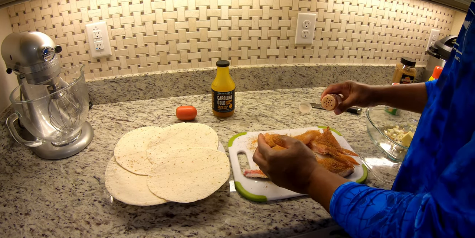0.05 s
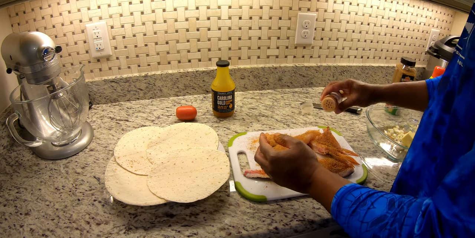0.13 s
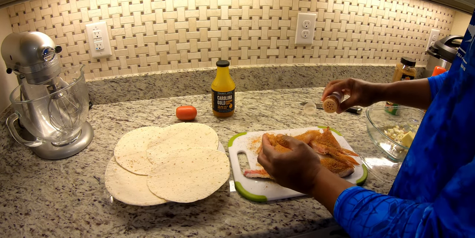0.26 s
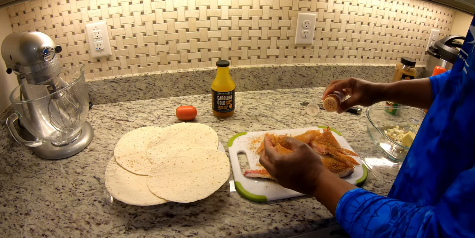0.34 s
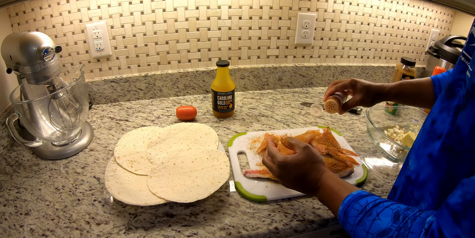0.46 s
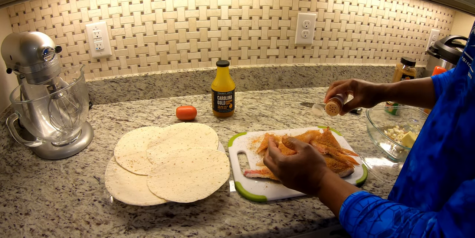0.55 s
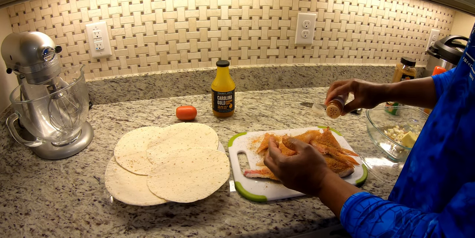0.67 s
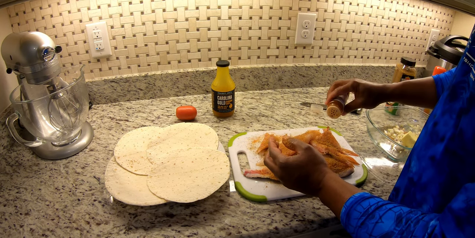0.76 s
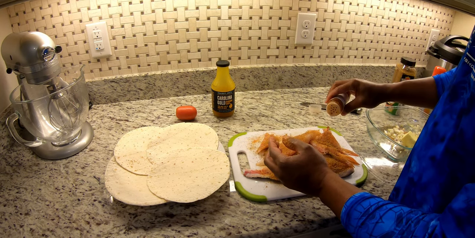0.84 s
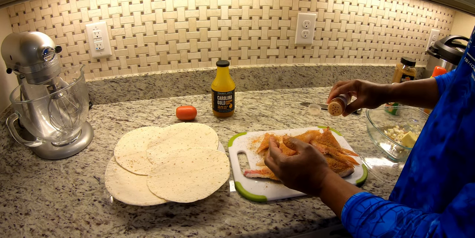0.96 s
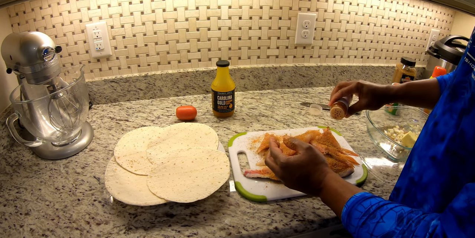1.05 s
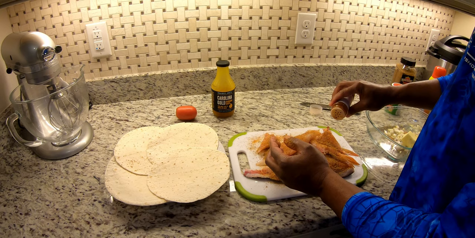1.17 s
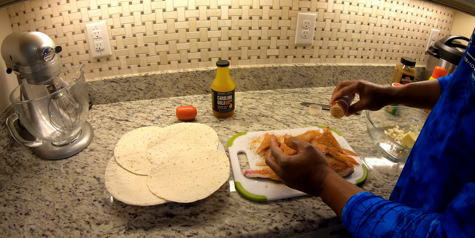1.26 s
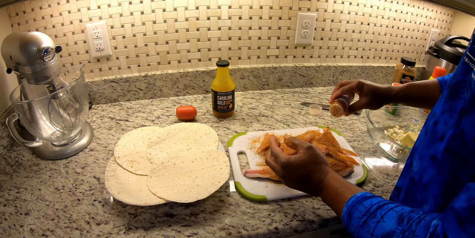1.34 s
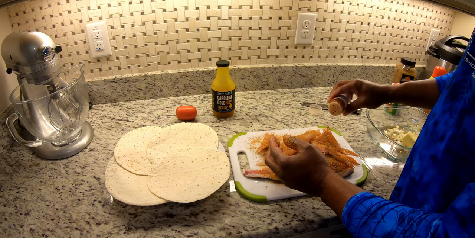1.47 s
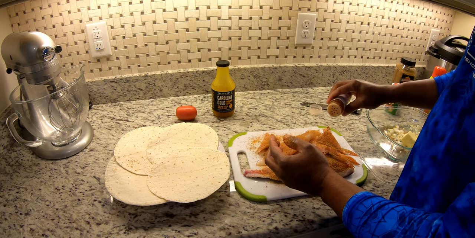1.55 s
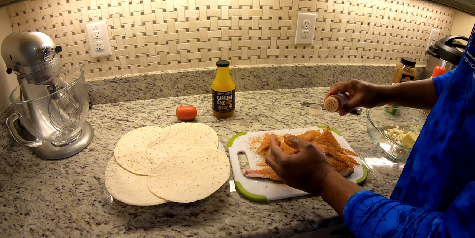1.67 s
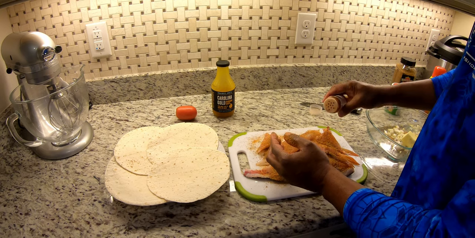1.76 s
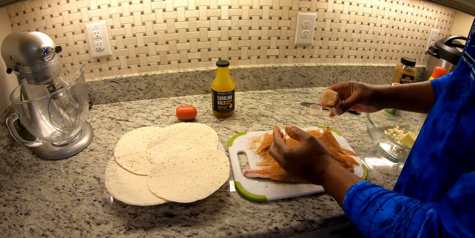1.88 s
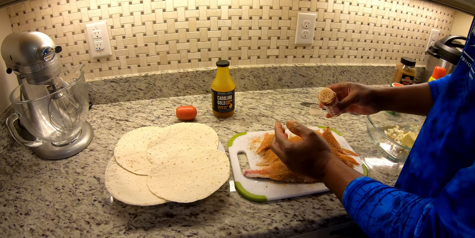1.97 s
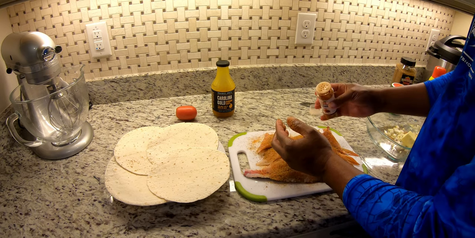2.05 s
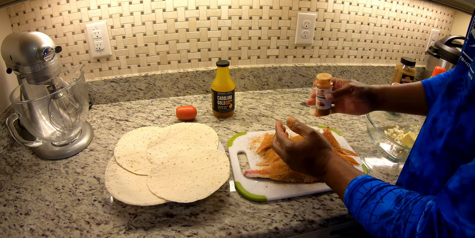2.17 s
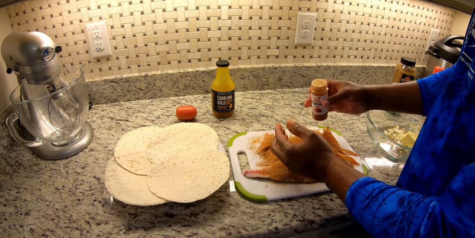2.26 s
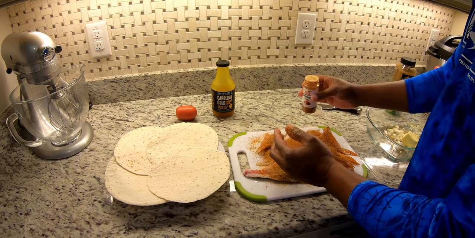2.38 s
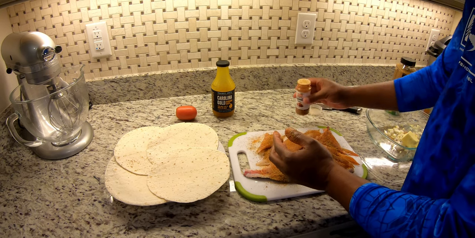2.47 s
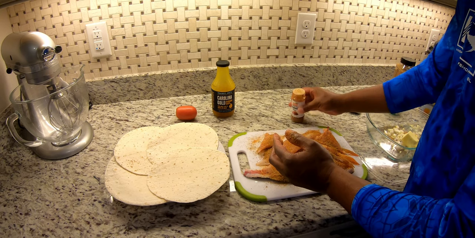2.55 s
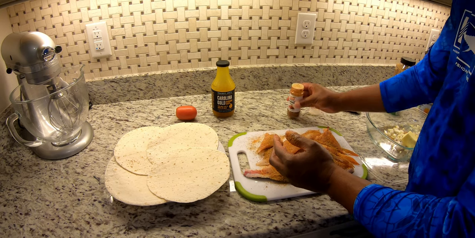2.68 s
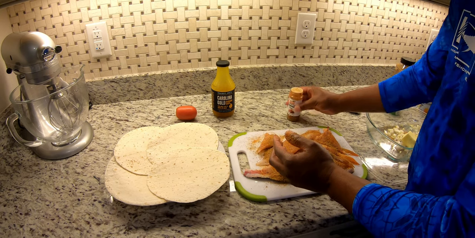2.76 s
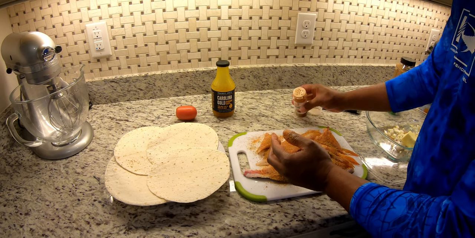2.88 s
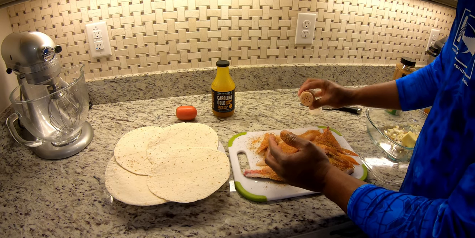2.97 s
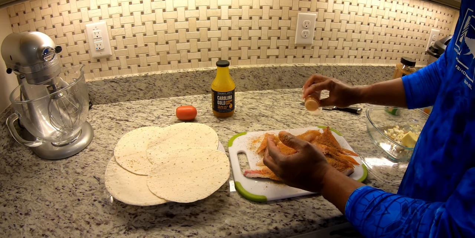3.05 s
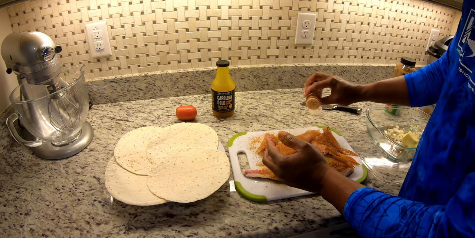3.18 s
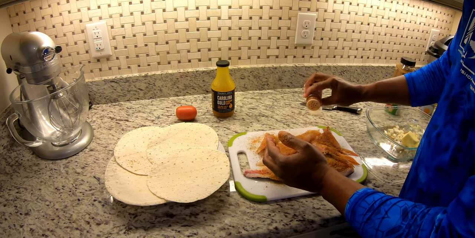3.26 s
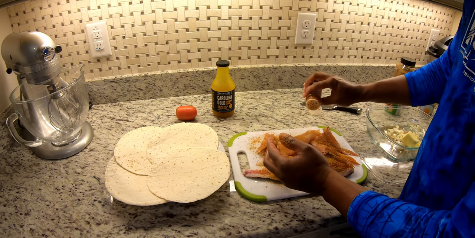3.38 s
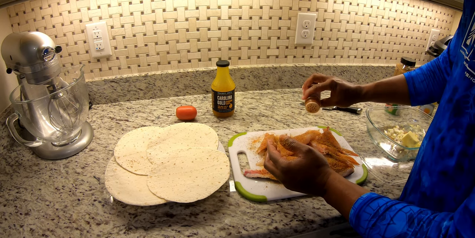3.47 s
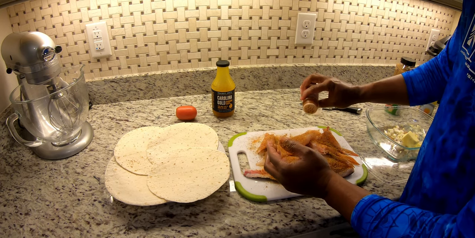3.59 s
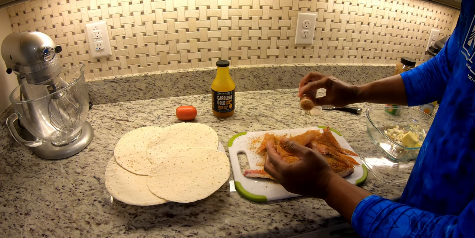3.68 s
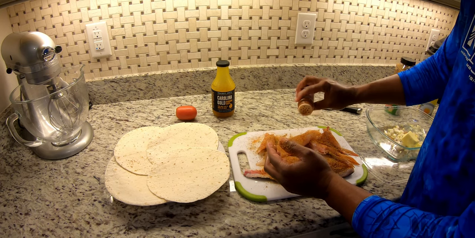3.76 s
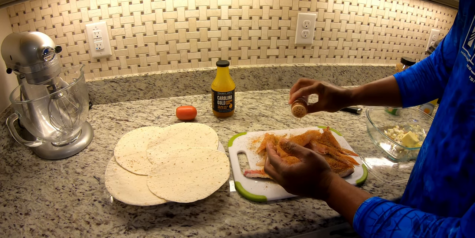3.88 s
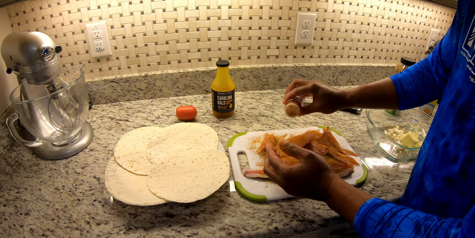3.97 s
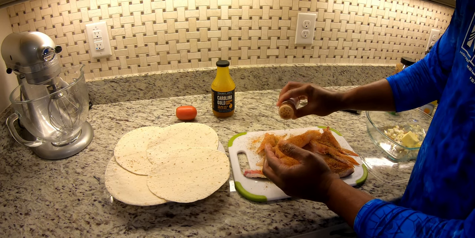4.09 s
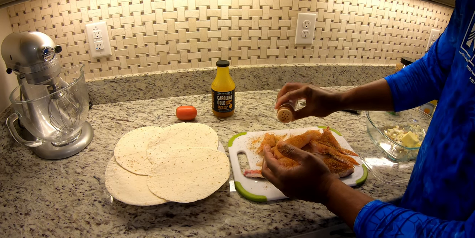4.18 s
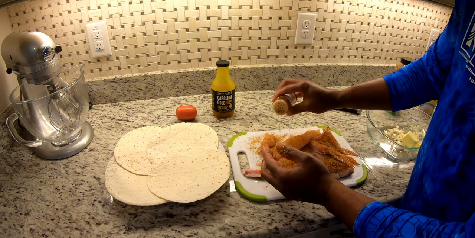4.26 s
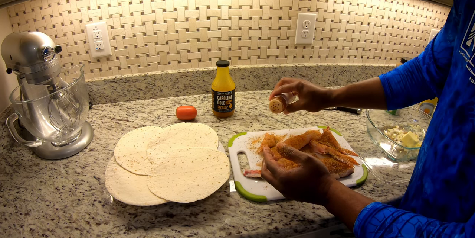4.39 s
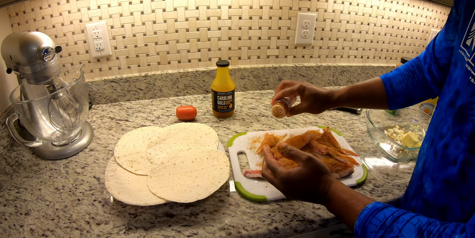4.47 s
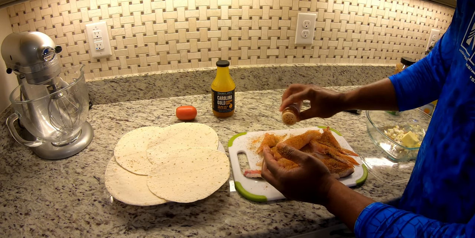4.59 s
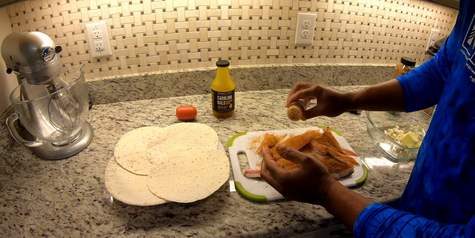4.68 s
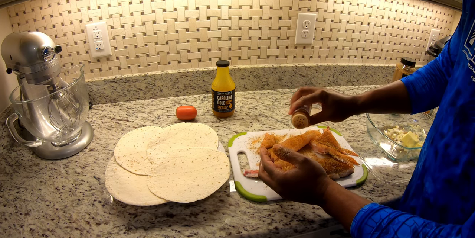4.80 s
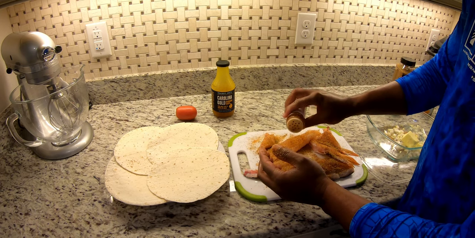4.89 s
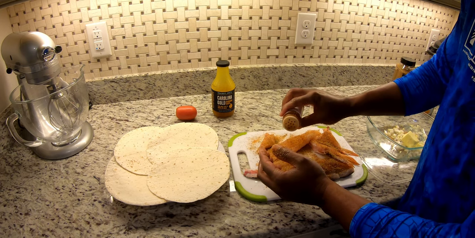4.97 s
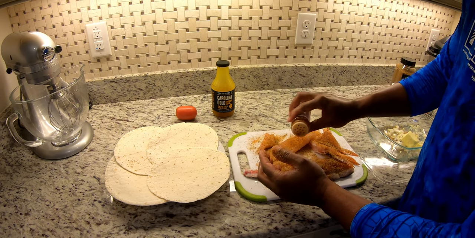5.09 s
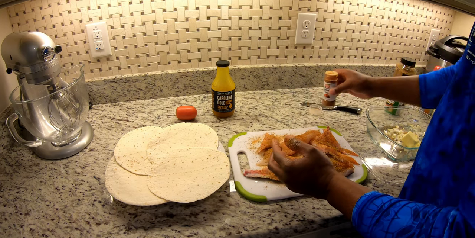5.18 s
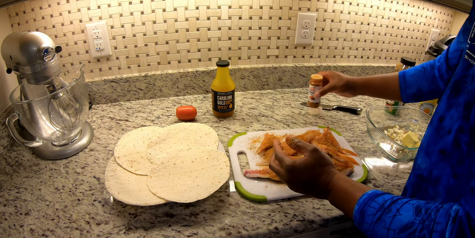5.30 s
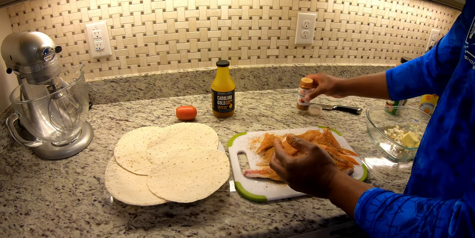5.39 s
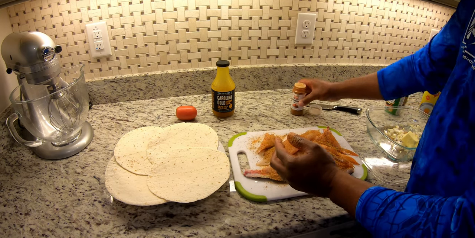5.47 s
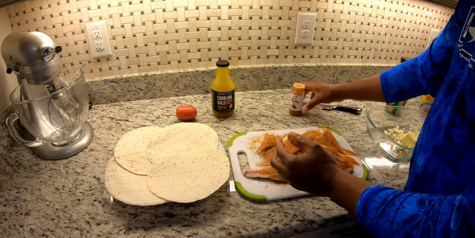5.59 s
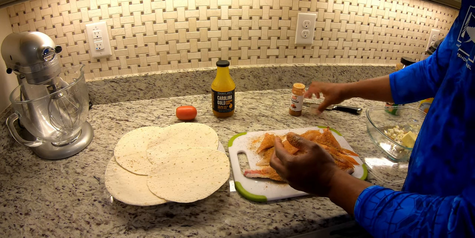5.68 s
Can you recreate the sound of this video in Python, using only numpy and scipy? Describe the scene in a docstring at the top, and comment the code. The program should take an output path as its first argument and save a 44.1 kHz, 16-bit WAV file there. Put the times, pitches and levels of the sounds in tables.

```python
"""A spice bottle is tipped and shaken in a hard-walled kitchen: the heap slides inside it, then grains
slap the plastic cap, faster and faster, and set the bottle's wall and air ringing. A few last grains drop.
The base knocks twice on the stone counter, each time a low thud and a crack; soft touches and faint rustles
are heard around this. A hollow metallic ring of fading partials starts abruptly, the room air and motor hum
come up with it, and the bottle is set down with a thud."""
import sys
import numpy as np
from scipy import signal
from scipy.fft import rfft, irfft
from scipy.io import wavfile

SR = 44100
rng = np.random.default_rng(int(sys.argv[2]) if len(sys.argv) > 2 else 0)


def transcribe(u):
    """Save the signal u as a 16-bit wav file named by the first command-line argument.

    u: samples, shape (n,) or (channels, n), limited to [-1, 1]; the rate is SR.
    q: integer samples, one column per channel.
    """
    v = np.clip(np.atleast_2d(u).T, -1, 1)
    q = np.round(v * 32767).astype(np.int16)
    wavfile.write(sys.argv[1], SR, q)


N = 253134
TIME = np.arange(N) / SR   # [s]
RING_S = 5.1745   # the metallic ring starts and the background comes up


def from_db(db):
    """Turn decibels into a gain."""
    return 10 ** (np.asarray(db) / 20)


def at_hz(points, hz, axis=1):
    """Read one column of a table at any frequency, on a log-frequency axis."""
    points = np.array(points)
    return np.interp(np.log(np.maximum(hz, 1)), np.log(points[:, 0]), points[:, axis])


def through(x, response):
    """Pass a sound through an impulse response."""
    return signal.fftconvolve(x, response)[:N]


def colour(x, spectrum, size=4096):
    """Give a sound the shape of a spectrum, with no sound ahead of time; white noise keeps its power."""
    log_gain = np.log(from_db(at_hz(spectrum, np.fft.rfftfreq(size, 1 / SR))))
    # folding the cepstrum forward makes the filter minimum-phase
    cepstrum = irfft(log_gain)
    cepstrum[1:size // 2] *= 2
    cepstrum[size // 2 + 1:] = 0
    response = irfft(np.exp(rfft(cepstrum)))
    return through(x, response / np.linalg.norm(response))


def struck(modes):
    """A struck object: a sum of sines that each fade by 60 dB in their t60, one second long."""
    t = TIME[:SR]
    return sum(from_db(db - 60 * t / t60) * np.sin(2 * np.pi * hz * t) for hz, db, t60 in modes)


def resonances(modes):
    """Impulse response of (Hz, width Hz, dB) resonances: wider ones die sooner; dB is the gain at the peak."""
    t = TIME[:SR // 20]
    response = 0
    for hz, width, db in modes:
        peak = from_db(db) * 2 * np.pi * width / SR
        response = response + peak * np.exp(-np.pi * width * t) * np.cos(2 * np.pi * hz * t)
    return response


def burst(start, length, rise, fall):
    """A loudness curve that rises, holds for a length and dies away (all in s)."""
    age = np.maximum(TIME - start, 0)
    time_falling = np.maximum(age - length, 0)
    return (1 - np.exp(-age / rise)) * np.exp(-np.minimum(time_falling / fall, 20))


def grains(per_s, spread_db):
    """Random tiny collisions of uneven size, scaled to an rms of 1."""
    sizes = from_db(spread_db * np.minimum(rng.exponential(1, N), 3)) * rng.choice([-1, 1], N)
    clicks = sizes * (rng.random(N) < per_s / SR)
    return clicks / np.std(clicks)


# colour of the quiet kitchen's air: (frequency [Hz], relative level [dB per Hz])
AIR_SPECTRUM = [(40, -5), (80, -4), (110, -1.5), (200, 0), (280, -1.5), (335, -8.5), (420, -2.5), (750, -7),
                (1000, -11.5), (1250, -15), (1450, -21), (2100, -19), (5000, -25.5), (10500, -27),
                (16000, -37)]
# appliance motor before the ring starts: (frequency [Hz], level [dB rms])
MOTOR_HUM = [(53.6, -66), (107.3, -68.5)]
AIR_DB = -60.5   # room air before the ring starts


def background(step_db):
    """Room air is coloured noise, motor hum is steady sines; both come up abruptly when the ring starts."""
    air = from_db(AIR_DB) * colour(rng.standard_normal(N), AIR_SPECTRUM)
    hum = 0
    for hz, db in MOTOR_HUM:
        hum = hum + from_db(db) * np.sqrt(2) * np.sin(2 * np.pi * (hz * TIME + rng.random()))
    return (air + hum) * from_db(step_db * (TIME > RING_S))


# counter, backsplash, far wall: (delay [s], strength [gain])
SURFACE_ECHOES = [(.0012, 0.033), (.0049, 0.091), (0.0333, 0.069)]
# kitchen reverberation: (frequency [Hz], time to fade by 60 dB [s], level [dB])
REVERBERATION = [(100, 0.48, -3.5), (267, 0.28, -15), (494, 0.44, -3), (1200, 0.56, -11.5),
                 (3530, 0.54, -7.5), (8000, 0.49, -11), (15000, 0.23, -7)]


def kitchen(x, build_up_s):
    """Near surfaces send back a few sharp echoes; a diffuse noise tail then dies band by band."""
    t = TIME[:SR]
    edges = np.geomspace(70, 17000, 17)   # band limits [Hz]
    response = np.zeros(SR)
    for low, high in zip(edges, edges[1:]):
        hz = np.sqrt(low * high)
        t60, level_db = at_hz(REVERBERATION, hz, axis=1), at_hz(REVERBERATION, hz, axis=2)
        band_filter = signal.butter(2, [low, high], "band", fs=SR, output="sos")
        band = signal.sosfilt(band_filter, rng.standard_normal(SR))
        tail = band * from_db(-60 * t / t60) * (1 - np.exp(-(t / build_up_s) ** 2))
        # wider bands carry more of the energy
        share = np.sqrt(2 * (high - low) / SR)
        response += from_db(level_db) * share * tail / np.linalg.norm(tail)
    for delay, strength in SURFACE_ECHOES:
        response[round(delay * SR)] += strength
    return x + through(x, response)


# the clear tones of the ring: (frequency [Hz], level [dB], time to fade by 60 dB [s])
RING_PARTIALS = [(380, -64, .9), (483.5, -29, 0.2), (497, -28.5, 1.0), (511, -24.5, 0.13), (600, -32, 0.33),
                 (700, -57, 0.4), (720, -45, 1.0), (823, -38.5, 0.98), (990, -58, .45), (975, -36, 0.69),
                 (1120, -68, 0.86), (1320, -44, 1), (1910, -58, 0.98)]
# its crowd of weak partials: (frequency [Hz], relative level [dB per Hz])
RING_WASH_SPECTRUM = [(200, -27), (330, -11), (400, 8.5), (600, 7), (700, 4), (850, 1.5), (1050, 3.5),
                      (1400, -4.5), (1900, -11), (2600, -24), (5000, -32)]


def metallic_ring():
    """A hollow ring like that of a pan or bowl: a few clear partials over a dying wash of noise."""
    blow = signal.unit_impulse(N, round(RING_S * SR))
    swell = burst(RING_S, 1, rise=0.002, fall=1)   # the partials take a moment to build
    partials = swell * through(blow, struck(RING_PARTIALS))
    wash = burst(RING_S, 0.026, rise=0.00066, fall=0.13) * rng.standard_normal(N)
    return partials + from_db(-34.5) * colour(wash, RING_WASH_SPECTRUM)


# clearest touches on bottle and food: (time [s], length [s], soft bump level [dB], rustle level [dB])
TOUCHES = [(2.07, 0.32, -67.5, -71.5), (3.035, 0.024, -55, -70), (4.479, 0.057, -57, -93),
           (5.207, .13, -50, -52.5), (5.507, 0.053, -56, -44)]
# colour of the soft bumps: (frequency [Hz], relative level [dB per Hz])
BUMP_SPECTRUM = [(60, -6), (150, 6.5), (350, -11), (520, -5), (660, 10.5), (900, -25), (2400, -13),
                 (5000, -60)]
# colour of the rustle: (frequency [Hz], relative level [dB per Hz])
RUSTLE_SPECTRUM = [(2000, -33), (6000, -12), (9000, -3.5), (12500, -7.5), (16000, -18)]
# faint rustles at random times within the span
FIDGETS, FIDGET_S, FIDGET_DB, FIDGET_SPAN_S = 5, 0.051, -73.5, (1.7, 4.3)


def handling():
    """Fingers shift on the bottle and the food: soft bumps of noise and a fine rustle of tiny clicks."""
    bump, rustle = np.zeros(N), np.zeros(N)
    for s, length, bump_db, rustle_db in TOUCHES:
        touch = burst(s, length, rise=length / 4, fall=length / 4)
        bump += from_db(bump_db) * touch
        rustle += from_db(rustle_db) * touch
    for s in rng.uniform(*FIDGET_SPAN_S, size=FIDGETS):
        rustle += from_db(FIDGET_DB) * burst(s, FIDGET_S, rise=FIDGET_S / 2, fall=FIDGET_S / 2)
    bumps = colour(bump * rng.standard_normal(N), BUMP_SPECTRUM)
    return bumps + colour(rustle * grains(per_s=3200, spread_db=4.5), RUSTLE_SPECTRUM)


# bottle on the counter: (time [s], level [dB], contact cut-off [Hz])
COUNTER_HITS = [(2.6142, -7, 11100), (2.772, -11.5, 10800), (2.872, -27.5, 1800), (2.883, -38.5, 12000),
                (5.5100, 0.5, 3320), (5.5361, -14.5, 3600), (5.5435, -17.5, 6000), (5.5464, -21, 13900)]
# bottle and counter ringing together: (frequency [Hz], level [dB], longest time to fade by 60 dB [s])
THUD_PARTIALS = [(104.7, -12.5, 0.24), (224, -41, 0.01), (237.7, -31.5, 0.31), (278, -13, 0.065),
                 (390.7, -12.5, 0.064), (443, -7, 0.058), (560, -9, 0.025), (525, -22, 0.68),
                 (662, -5, 0.057), (655, -30, 0.094), (749, -13.5, 0.047), (1044, -13, 0.042),
                 (1237, -20.5, 0.08), (1670, -15.5, 0.024), (1988, -16.5, 0.047), (2184, -20, 0.033),
                 (2400, -39.5, .03), (3700, -49, 0.022)]
# colour of the crack: (frequency [Hz], relative level [dB per Hz])
CRACK_SPECTRUM = [(100, -82.5), (400, -11.5), (1200, 8), (1550, 1), (2050, 9.5), (2500, -2.5), (3800, 1),
                  (4700, -5.5), (6200, -6), (7500, 1.5), (8800, -4), (11000, -6), (15500, -20.5)]
# crack over thud at a hard contact; a softer one cracks less
HARD_CONTACT_HZ, CRACK_DB, CRACK_DB_PER_OCTAVE = 10800, -9, 4.5
ROCK_S, ROCK_DB = .0052, -9   # the base lands on its rim and thuds again as it rocks flat
THUD_DULLING = 0.27   # the thud is dulled from this share of the contact cut-off upwards


def knocks():
    """The bottle's base hits the stone: a low thud and a short crack, duller when it lands softly."""
    # every mode dies within some 170 cycles, so the knock stays short
    thud = struck([(hz, db, min(t60, .36, 170 / hz)) for hz, db, t60 in THUD_PARTIALS])
    thuds, cracks = np.zeros(N), np.zeros(N)
    for s, thud_db, contact_hz in COUNTER_HITS:
        octaves_harder = np.log2(contact_hz / HARD_CONTACT_HZ)
        crack_db = thud_db + CRACK_DB + CRACK_DB_PER_OCTAVE * octaves_harder
        contact = signal.butter(1, min(contact_hz, SR * .45), fs=SR)
        push = signal.butter(1, min(THUD_DULLING * contact_hz, SR * .45), fs=SR)
        blow = from_db(thud_db) * signal.unit_impulse(N, round(s * SR))
        thuds += signal.lfilter(*push, blow + 1e-18)   # the tiny offset only keeps the filter fast
        snap = burst(s, 0.0003, rise=.0001, fall=0.0065) * rng.standard_normal(N)
        cracks += signal.lfilter(*contact, from_db(crack_db) * snap)
    thuds += from_db(ROCK_DB) * np.roll(thuds, round(ROCK_S * SR))
    knock = colour(cracks, CRACK_SPECTRUM) - through(thuds, thud)
    # the knock has little below 150 Hz
    return signal.sosfilt(signal.butter(4, 150, "high", fs=SR, output="sos"), knock)


# air in the bottle: (ratio to the air resonance [1], width [Hz], relative level [dB])
AIR_MODES = [(.46, 110, 7), (.87, 218, 10), (0.998, 140, 22.5), (1.12, 180, -33), (1.24, 136, -3)]


def bottle_air(hz):
    """Impulse response of the hollow air in the bottle; white noise keeps its power."""
    air = resonances([(ratio * hz, width, db) for ratio, width, db in AIR_MODES])
    return air / np.linalg.norm(air)


HAND_STOPS_S, SETTLE_DB_PER_S = 1.39, 140   # then the loose spice comes to rest


def settling_db(s):
    """The loose spice moves evenly while the hand shakes, and dies down over a second once it stops."""
    return -SETTLE_DB_PER_S * np.clip(s - HAND_STOPS_S, 0, 1)


# the air resonance wanders as the heap shifts: (time [s], frequency [Hz])
AIR_PITCH = [(0.0, 2000), (0.154, 2070), (0.25, 1960), (0.34, 2125), (0.918, 2130), (1.07, 2220),
             (1.55, 2000)]
TIPPED_S, TIPPING_DB, TIPPING_HZ = 0.24, -59.5, 2000   # at first the whole heap slides down to the cap
SLIDE_DB = -66.5   # spice sliding between the strokes, until it settles


def sliding():
    """The heap slides as the bottle is tipped, then keeps shifting; its tiny clicks make the air murmur."""
    trickle = grains(per_s=1500, spread_db=2.0)
    tipping = from_db(TIPPING_DB) * burst(0, TIPPED_S, rise=0.0014, fall=0.014)
    shifting = from_db(SLIDE_DB + settling_db(TIME))
    usual_hz = np.median(np.array(AIR_PITCH)[:, 1])
    tipping_sound = through(tipping * trickle, bottle_air(TIPPING_HZ))
    return tipping_sound + through(shifting * trickle, bottle_air(usual_hz))


HOLLOW_DB, USUAL_STROKE_DB = -40.5, -38   # the hollow tone's base level, at a stroke of usual level
HOLLOW_FOLLOWS = 0.41   # its share of the strokes' swing in dB
DULLING_DB_PER_S = 2.5   # it dulls as the spice packs


def hollow_gain(db, s):
    """The air rings louder after a harder stroke, though less than in proportion."""
    swing_db = HOLLOW_FOLLOWS * (db - USUAL_STROKE_DB)
    return from_db(HOLLOW_DB + swing_db - DULLING_DB_PER_S * s + settling_db(s))


# the bottle's wall: (ratio to the wall resonance [1], width [Hz], gain [dB])
WALL_MODES = [(.57, 390, 3.5), (1, 680, -2.5), (1.64, 1070, 2.5)]
# the wall resonance sinks as the first strokes pack spice against it
PACKING_SPAN_S, WALL_SINKS_HZ = (.13, 0.4), (6040, 4920)


def bottle_wall(s):
    """Impulse response of the wall at a given time; packed spice lowers its pitch."""
    wall_hz = np.interp(s, PACKING_SPAN_S, WALL_SINKS_HZ)
    return resonances([(ratio * wall_hz, width, gain_db) for ratio, width, gain_db in WALL_MODES])


# one row for each stroke of the hand; the last is a few grains dropping as the bottle is turned upright:
# (time the heap lands [s], relative level [dB], length of the spill [s], head start of loose grains [s])
HAND_STROKES = [(0.1026, -25, 0.0065, 0.014), (.226, -37.5, 0.0044, 0.0079), (0.3464, -31.5, 0.014, 0.0048),
                (0.4654, -31, 0.0043, 0.0053), (.577, -32, 0.0052, 0.012), (0.673, -39, 0.016, 0.013),
                (0.757, -38, .031, 0), (0.857, -37.5, 0.018, .012), (.924, -45.5, 0.034, 0),
                (1.004, -49.5, 0.021, 0.0076), (1.0893, -32, 0.0013, 0.0079), (1.162, -39, 0.0051, 0.0041),
                (1.22, -32.5, 0.0098, 0), (1.28, -42, .013, 0), (1.334, -42, 0.0076, 0.0051),
                (1.382, -39, 0.0088, 0.002), (1.422, -44.5, 0.014, 0.0032), (1.4639, -29.5, 0.0036, 0),
                (1.4959, -34, 0.0047, 0.017), (1.521, -44.5, 0.0025, 0), (2.4445, -50.5, 0.0035, 0)]
# colour of grains on the cap: (frequency [Hz], relative level [dB per Hz])
CRACKLE_SPECTRUM = [(400, -13.5), (750, -10), (1050, 0.5), (1400, -10.5), (2100, 12.5), (2700, -2),
                    (3400, -7.5), (4300, -0.5), (5600, -0.5), (6900, -8.5), (8000, -6.5), (10000, -5.5),
                    (12500, -14), (16000, -19)]
LOOSE_DB = -51.5   # the loose grains that run ahead of the heap, on the strokes' scale
CLUMP_DB, CLUMP_S = 20.5, 0.0046   # a clump lands with the heap, weaker the longer the spill
CRACKLE_DB = -7.5   # overall gain of the crackle


def shaker():
    """Each stroke throws grains at the cap, loose ones first; they crackle and ring the wall and air."""
    hail, patter = grains(per_s=3500, spread_db=5.5), grains(per_s=5000, spread_db=3.5)
    crackle, hollow = np.zeros(N), np.zeros(N)
    for s, db, length, lead in HAND_STROKES:
        start = int((s - lead) * SR)
        span = slice(start, start + SR // 7)
        loose = (TIME >= s - lead) & (TIME < s)
        heap = from_db(db) * burst(s, length, rise=0.00019, fall=0.0051)
        spill = hail * (from_db(LOOSE_DB) * loose + heap)
        # the clump is a single click half a millisecond in
        spill[int(s * SR) + SR // 2000] += from_db(db + CLUMP_DB) * np.exp(-length / CLUMP_S)
        air_push = hollow_gain(db, s) * burst(s, length, rise=0.0036, fall=0.011)
        drive = patter * (hollow_gain(LOOSE_DB, s) * loose + air_push)
        sharp, soft = spill[span], drive[span]
        air = bottle_air(np.interp(s, *np.transpose(AIR_PITCH)))
        crackle[span] += sharp + signal.fftconvolve(sharp, bottle_wall(s))[:len(sharp)]
        hollow[span] += signal.fftconvolve(soft, air)[:len(soft)]
    return from_db(CRACKLE_DB) * colour(crackle, CRACKLE_SPECTRUM) + hollow


def scene():
    """Everything done with the bottle sounds through the kitchen; the ring and background are added."""
    near = kitchen(shaker() + sliding() + knocks() + handling(), build_up_s=0.0023)
    return (near + metallic_ring() + background(step_db=18.0))[None]


def record(dry):
    """The microphone drops the deep bass, peaks stop at full scale, the top is cut above 16 kHz."""
    thin = signal.sosfilt(signal.butter(6, 44, "high", fs=SR, output="sos"), dry)
    top_cut = signal.ellip(10, .1, 80, 16000, fs=SR, output="sos")
    return signal.sosfilt(top_cut, np.clip(thin, -1, 1))


dry = scene()
out = record(dry)
transcribe(out)
```